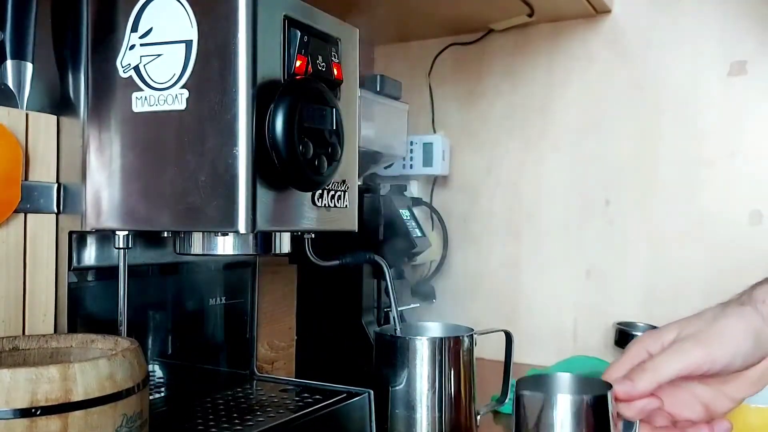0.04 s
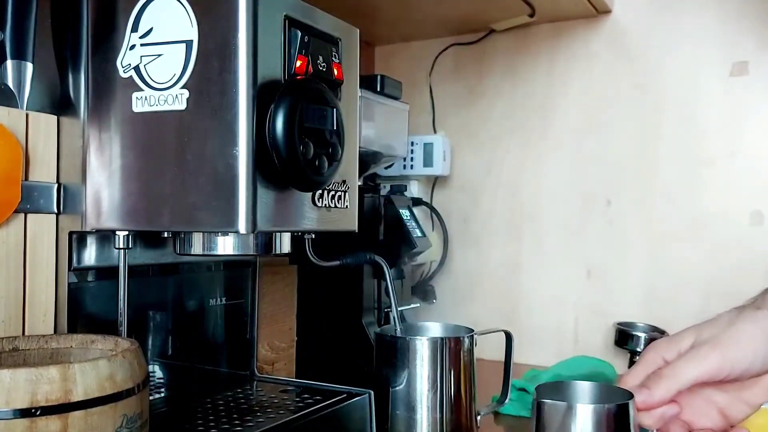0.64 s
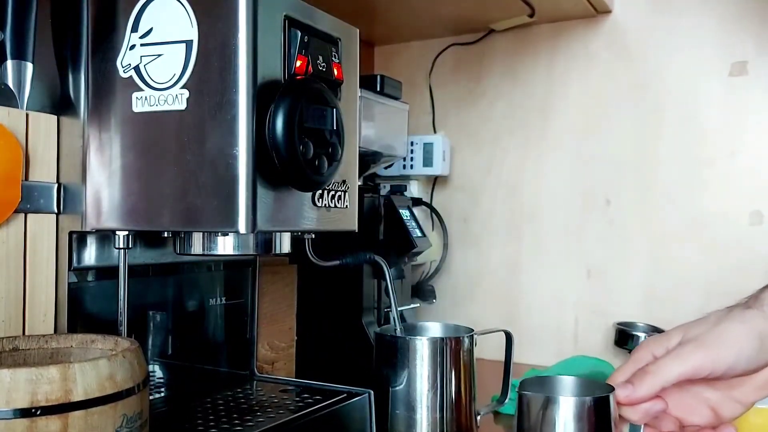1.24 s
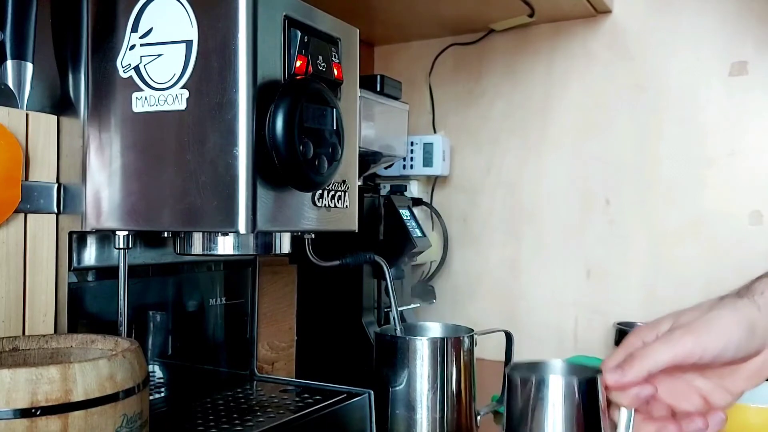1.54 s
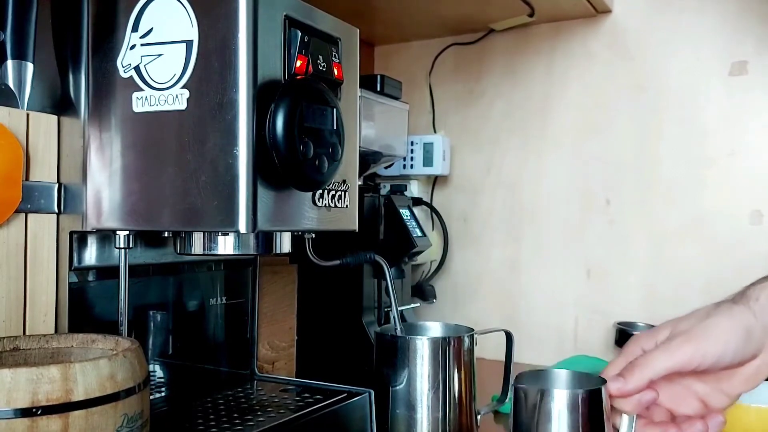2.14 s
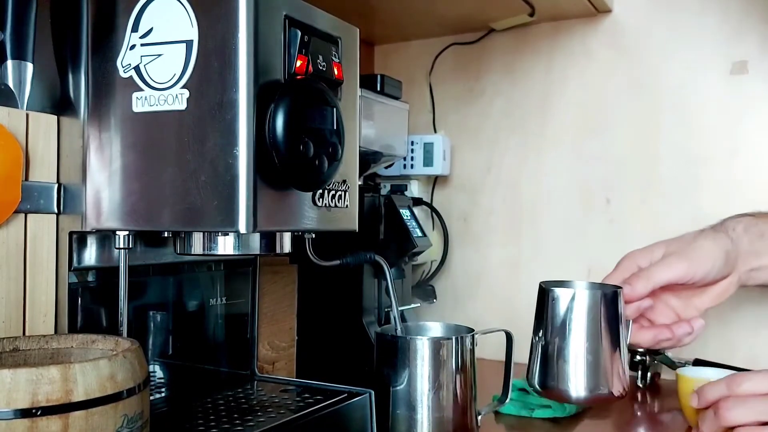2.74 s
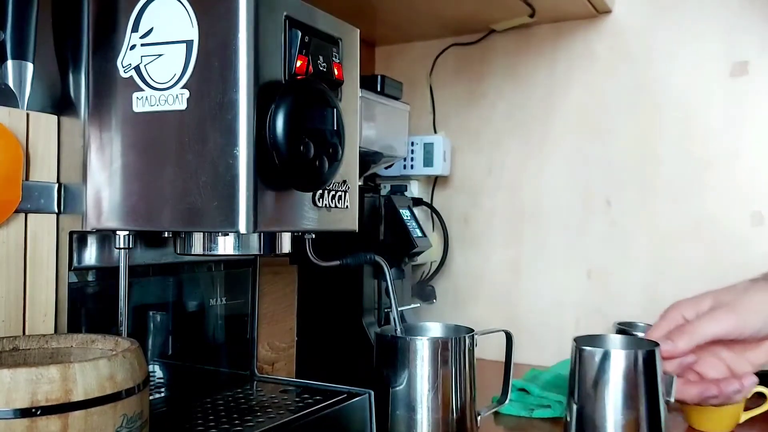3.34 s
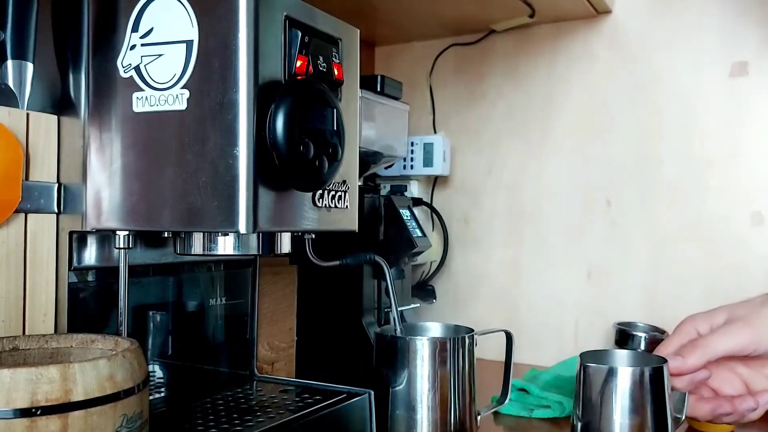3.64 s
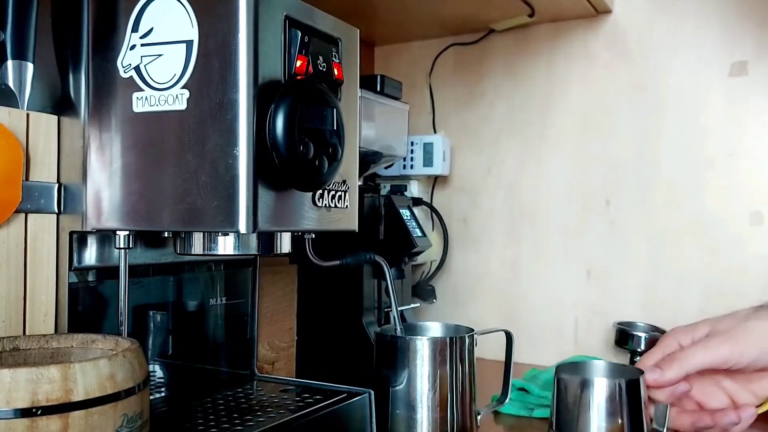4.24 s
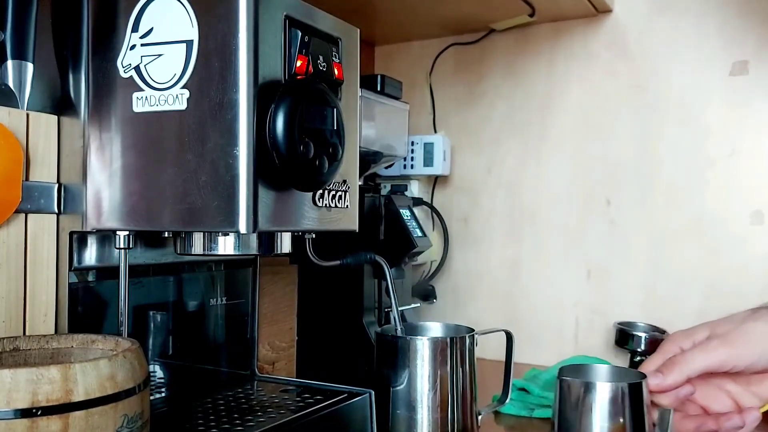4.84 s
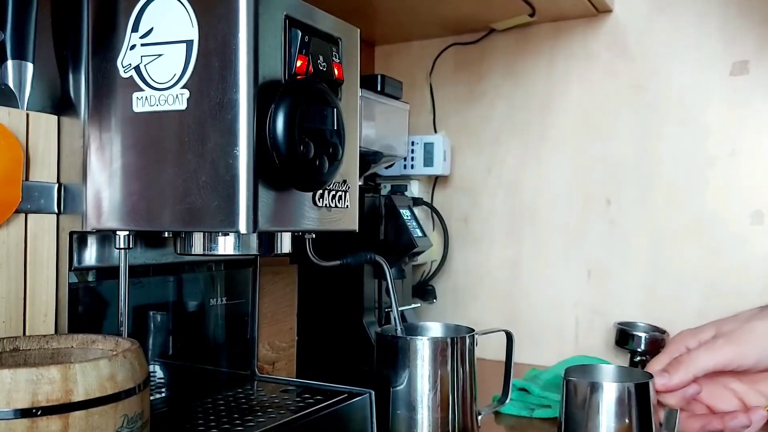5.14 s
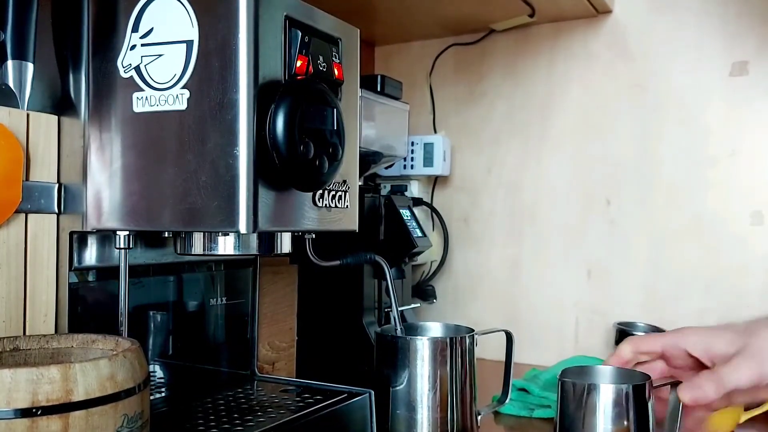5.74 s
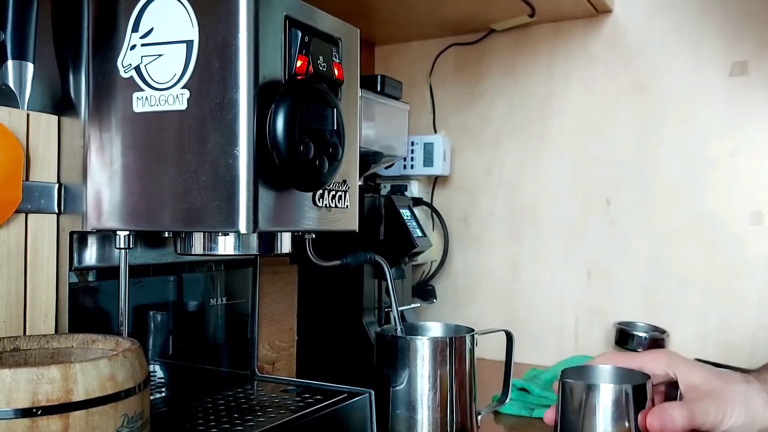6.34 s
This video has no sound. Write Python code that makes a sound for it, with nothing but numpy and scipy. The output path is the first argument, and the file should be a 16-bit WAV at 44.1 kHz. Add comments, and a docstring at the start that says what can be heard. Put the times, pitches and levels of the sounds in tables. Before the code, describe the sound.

A steel milk pitcher is knocked on a wooden counter in short sets and swirled, while a steam wand hisses faintly.

```python
"""A steel pitcher of foamed milk is knocked on a wooden counter to burst the bubbles: each impact excites
damped modes of wood and steel, while the steam wand hisses faintly. Three knocks, some scraping, three
more; then a cup is slid aside, and friction makes the dragged pitcher sing. After another three knocks
it is swirled ever more firmly, a low drone swells, and two knocks end the scene.
The near microphone rounds off their peaks, as it does throughout."""
import sys
import numpy as np
from scipy import signal
from scipy.fft import rfft, irfft
from scipy.io import wavfile
from scipy.ndimage import uniform_filter1d

SR = 44100
rng = np.random.default_rng(int(sys.argv[2]) if len(sys.argv) > 2 else 0)


def master(y):
    """Save y as 16-bit WAV."""
    cut = np.clip(np.atleast_2d(y).T, -1, 1)
    pcm = np.round(cut * 32767)  # scale
    wavfile.write(sys.argv[1], SR, pcm.astype(np.int16))


N = 290619
TIME = np.arange(N) / SR
# modes of the pitcher's wall, damped by milk and hand: pitch_hz, level_db, t60_s
STEEL_MODES = [(1451, -7, .35), (1547, -9, 0.5), (1770, -10, 0.34), (2035, -8, 0.22), (2150, -9, 0.68),
               (2260, -4, 0.27), (2480, -9.5, 0.18), (2640, -19, 0.12), (2890, -14.5, .35),
               (5700, -18.5, .3), (6200, -15, 0.5)]


def amp(db):
    """Amplitude ratio of a level in decibels."""
    return 10 ** (np.asarray(db) / 20)


def unit_rms(x):
    """Normalisation to unit mean power."""
    return x / np.sqrt(np.mean(x ** 2) + 1e-20)


def value_at(points, hz):
    """Interpolation on a logarithmic frequency axis."""
    frequency_hz, value = np.transpose(points)
    return np.interp(np.log(hz + 1), np.log(frequency_hz + 1), value)


def add(mix, start_s, sound):
    """Superposition: a stereo sound joins the mix at start_s."""
    part = mix[:, max(round(start_s * SR), 0):][:, :sound.shape[1]]
    part += sound[:, :part.shape[1]]


def band(centre_hz, octaves):
    """Flat-topped band-pass response, in rows of frequency_hz, gain_db."""
    hz = np.geomspace(20, 16000, num=300)
    return np.transpose([hz, -10 * np.log10(1 + (np.log2(hz / centre_hz) / octaves) ** 4)])


def high_pass(x, hz):
    """Second-order Butterworth bass cut."""
    return signal.sosfilt(signal.butter(2, hz, "high", fs=SR, output="sos"), x)


def colour(x, spectrum):
    """Minimum-phase filter: its phase follows from the log gain by the Hilbert transform."""
    hz = abs(np.fft.fftfreq(4096, 1 / SR))
    log_gain = np.log(amp(np.maximum(value_at(spectrum, hz), -100)))
    taps = np.fft.ifft(np.exp(np.conj(signal.hilbert(log_gain)))).real[:2048]
    return signal.fftconvolve(x, taps[None], axes=1)[:, :x.shape[1]]


def random_gain(position, depth_db):
    """Log-normal fluctuation, with a new value at each whole step of position."""
    steps = rng.standard_normal(4000)
    return amp(depth_db * np.interp(position, np.arange(len(steps)), steps))


def flutter(rate_hz, depth_db):
    """Random modulation: a factor that wanders about rate_hz times a second."""
    return random_gain(TIME * rate_hz, depth_db)


def noise(spectrum, size=N, resonant=False):
    """Diffuse-field noise of rms 1: the channels are coherent in the bass, independent in the treble."""
    # likeness of left and right: frequency_hz, correlation
    coherence = [(60, 0.94), (300, 0.94), (630, 0.27), (1300, 0), (15000, 0.012)]
    hz = np.fft.rfftfreq(size, 1 / SR)
    left, independent = rfft(rng.standard_normal((2, size)))
    correlation = np.clip(value_at(coherence, hz), -1, 1)
    right = correlation * left + np.sqrt(1 - correlation ** 2) * independent
    shape = amp(value_at(spectrum, hz))
    if resonant:  # crowded resonances ripple the spectrum, less so in the bass
        shape = shape * random_gain(hz / 53.86, depth_db=5) ** np.minimum(hz / 1200, 1)
    return unit_rms(irfft(np.array([left, right]) * shape, size))


def gesture(start_s, length_s, attack_s=0.033, release_s=0.043, sag_db_per_s=0):
    """Envelope of one movement: linear attack, a hold that may sag, exponential release."""
    t = np.maximum(TIME - start_s, 0)
    release = np.exp(-np.maximum(t - length_s, 0) / release_s)
    return np.minimum(t / attack_s, 1) * amp(-sag_db_per_s * t) * release


def patchy(x, depth_db=3.5):
    """Turbulence and friction are unsteady: brief patches of the treble swell and sink."""
    hz, _, spectra = signal.stft(x, SR, nperseg=1024)
    field = uniform_filter1d(rng.standard_normal(spectra.shape[1:]), size=3, axis=0)
    field = unit_rms(uniform_filter1d(field, size=7, axis=1))
    spectra = spectra * amp(depth_db * field * np.minimum(hz / 1500, 1)[:, None])
    return signal.istft(spectra, SR, nperseg=1024)[1][:, :N]


def drone():
    """A low sine under random frequency modulation swells towards the end."""
    # course of the tone: time_s, pitch_hz, level_db
    course = [(0, 55.1, -59.5), (3.8, 56, -68), (4.2, 56.6, -50), (5.0, 54.3, -61), (5.32, 55.9, -52),
              (5.55, 52.4, -61), (6.33, 56.8, -40), (6.59, 57.3, -43)]
    time_s, pitch_hz, level_db = np.transpose(course)
    wavering_hz = np.interp(TIME, time_s, pitch_hz) * flutter(rate_hz=10, depth_db=1.3)
    cycles = np.cumsum(wavering_hz) / SR
    return amp(np.interp(TIME, time_s, level_db)) * np.sin(2 * np.pi * cycles)


def cabinet_booms():
    """Forced vibration: things moved on the counter drive two low modes of the cabinet."""
    # soft booms: start_s, length_s, level_db
    booms = [(1.28, 0.1, -54), (1.45, 0.085, -51), (2.92, 0.67, -60), (3.62, 0.085, -59),
             (3.92, 0.47, -54.5), (6.003, 0.15, -46), (6.231, 0.16, -47)]
    drive = amp(-64)  # between the booms
    for start_s, length_s, level_db in booms:
        push = gesture(start_s, length_s, attack_s=0.023, release_s=0.028)
        drive = np.hypot(drive, amp(level_db) * push)
    return drive * (noise(band(106, octaves=0.093)) + amp(-5.5) * noise(band(168.5, octaves=0.035)))


def background():
    """Stationary room noise, with drone and booms set slightly left by a level difference."""
    # quiet of the kitchen: frequency_hz, density_db
    room_spectrum = [(15, -31), (25, -10), (95, 4.5), (175, -1), (210, -7), (420, -1), (796, -12.5),
                     (1510, -10.5), (2860, -27.5), (5560, -20), (9220, -36.5), (13000, -59), (14500, -31.5)]
    return (drone() + cabinet_booms()) * amp([[1], [-1]]) + amp(-61) * noise(room_spectrum)


def steam_wand():
    """Turbulent jet noise: the last steam leaks ever more weakly and puffs with a thin sizzle."""
    # escaping steam: frequency_hz, density_db
    hiss_spectrum = [(1500, 8), (3500, 1), (6000, 1), (9000, 1.5), (12000, 7.5), (14500, 0.5)]
    # puffs of steam: start_s, length_s, hiss_db, sizzle_db
    puffs = [(-0.05, 0.67, -54, -84.5), (3.556, 0.07, -72, -54.5), (3.89, 0.56, -65.5, -62),
             (4.2, 0.064, -61, -51), (4.3, 0.33, -59.5, -78), (5.01, 0.16, -80, -70.5),
             (5.83, 0.26, -63, -88)]
    sizzle_spectrum = [(10500, -47), (12500, -2.5), (13200, -2.0), (14400, -9.5)]
    flow, spit = amp(-59.5 - 2.5 * TIME), np.zeros(N)
    for start_s, length_s, hiss_db, sizzle_db in puffs:
        puff = gesture(start_s, length_s, attack_s=0.045, release_s=0.06, sag_db_per_s=3)
        flow = np.hypot(flow, amp(hiss_db) * puff)  # incoherent sources add in power
        spit = np.hypot(spit, amp(sizzle_db) * puff)
    hiss = noise(hiss_spectrum) * flow * flutter(rate_hz=35, depth_db=-0.9)
    sizzle = noise(sizzle_spectrum) * spit * flutter(rate_hz=25, depth_db=-1.0)
    return hiss + sizzle


def sliding_cup(start_s=2.717, length_s=0.78, level_db=-43):
    """Sliding friction: the cup's grainy noise follows a power law of its speed."""
    # cup rubbing on wood: frequency_hz, density_db
    cup_spectrum = [(120, -71), (200, -18), (313, -9), (410, -4), (456, -8.5), (620, 3), (727, -8.5),
                    (830, -3.5), (1100, -11.5), (1310, -7.5), (1880, -17), (2020, -20.5), (9600, -29.5),
                    (13500, -26), (14500, -34)]
    progress = np.clip((TIME - start_s) / length_s, 0, 1)
    speed = abs(np.sin(np.pi * progress ** 1.38))  # top speed comes late
    rubbing = noise(cup_spectrum) * amp(level_db) * speed ** 0.79
    return rubbing * flutter(rate_hz=100, depth_db=0.5) * amp([[1.5], [-.5]])


def friction_envelopes(swirl_start_s=4.9, turns_per_s=6.12):
    """Friction drives rumble and scrape: single strokes, then circles that bear down ever harder."""
    # strokes of the pitcher's base: start_s, length_s, rumble_db, scrape_db
    strokes = [(0.798, 0.14, -61.5, -52.5), (0.996, 0.1, -55, -68), (1.142, 0.077, -55, -50.5),
               (1.322, 0.19, -59.5, -55), (2.505, 0.027, -71.5, -56), (2.67, 0.06, -57, -65),
               (3.515, 0.37, -51, -60), (3.844, 0.098, -48.5, -44), (3.94, 0.48, -50.5, -55),
               (6.297, 0.087, -54.5, -45)]
    t = np.maximum(TIME - swirl_start_s, 0)
    circles = np.minimum(t / 0.059, 1) * amp(0.6 * np.cos(2 * np.pi * turns_per_s * t))
    rumble = circles * amp(-60 + 3.5 * t)
    scrape = circles * amp(-71 + 9 * t)
    for start_s, length_s, rumble_db, scrape_db in strokes:
        push = gesture(start_s, length_s, sag_db_per_s=9)
        rumble = np.hypot(rumble, amp(rumble_db) * push)
        scrape = np.hypot(scrape, amp(scrape_db) * push)
    return rumble, scrape


def singing_wall(width_hz=7, level_db=-51):
    """Resonance: friction sustains the narrow modes of the steel wall, the lower ones most."""
    # force of dragging: frequency_hz, level_db
    drag_spectrum = [(1200, 12.5), (1560, -0.5), (1800, -2), (2100, -8.5), (2400, -23), (2830, -0.5),
                     (4000, -11.5), (7000, -19.5)]
    hz = np.fft.rfftfreq(N, 1 / SR)
    response = sum(amp(db) / (1 + ((hz - mode_hz) / width_hz) ** 2) for mode_hz, db, _ in STEEL_MODES)
    force = rfft(rng.standard_normal((2, N))) * amp(value_at(drag_spectrum, hz))
    drag = amp(level_db) * gesture(start_s=3.85, length_s=0.41, sag_db_per_s=16.5)
    return unit_rms(irfft(force * response, N)) * drag


def swirling():
    """Uneven friction under the pitcher: the counter rumbles, the steel scrapes, the milk swishes."""
    # rubbed counter: frequency_hz, density_db
    rumble_spectrum = [(120, -20.5), (230, -14.5), (310, 1.5), (400, -9), (540, -3.5), (700, -14),
                       (1100, -15.5), (2500, -33.5)]
    # scraping steel: frequency_hz, density_db
    scrape_spectrum = [(500, -22), (1000, 4), (1500, 4.5), (2100, 1), (2600, -7.5), (4200, -11.5),
                       (6500, -23), (14000, -12)]
    # swishes of milk and base, and at 4.09 s a thin sizzle of steam: start_s, length_s, level_db, centre_hz,
    # half_width_octaves
    swishes = [(0.81, 0.049, -62.5, 3900, 0.16), (0.893, 0.066, -63, 5970, 1.7),
               (1.048, 0.068, -60.5, 3850, 0.21), (1.163, 0.058, -60, 7000, 1.4),
               (1.325, 0.07, -58, 3750, 0.46), (1.398, 0.11, -45.5, 7500, 1.6),
               (3.84, 0.085, -60, 5000, 1.5), (4.091, 0.062, -53, 11500, 0.42),
               (6.314, 0.059, -52, 4500, 1.2)]
    rumbling, scraping = friction_envelopes()
    rumble = noise(rumble_spectrum) * amp(-1) * rumbling * flutter(rate_hz=10, depth_db=-2.3)
    scrape = noise(scrape_spectrum) * amp(-3) * scraping * flutter(rate_hz=130, depth_db=2.0)
    out = rumble + scrape + singing_wall()
    for start_s, length_s, level_db, centre_hz, octaves in swishes:
        progress = np.maximum(TIME - start_s, 0) / length_s
        envelope = np.minimum(progress / 0.17, 1) * np.exp(-progress ** 2)
        out += amp(level_db) * noise(band(centre_hz, octaves), resonant=True) * envelope
    return out


def reverberation():
    """One second of diffuse kitchen echoes, each band decaying exponentially at its own rate."""
    # echoes at their onset: frequency_hz, density_db
    echo_spectrum = [(40, -13), (190, -26.5), (260, 0), (450, 0), (620, -2), (820, -4.5), (1050, -10.5),
                     (1300, -12), (1520, -18), (2450, -23.5), (3100, -31.5), (6300, -38.5), (14500, -42)]
    # reverberation times: frequency_hz, t60_s
    decay_times = [(100, 0.71), (400, 0.32), (1000, 0.33), (2500, 0.4), (6000, 0.47), (14000, 0.34)]
    hz, t, spectra = signal.stft(noise(echo_spectrum, size=SR, resonant=True), SR, nperseg=256)
    decay = amp(-60 * t / value_at(decay_times, hz)[:, None])
    return signal.istft(spectra * decay, SR, nperseg=256)[1][:, :SR]


def ring(modes, t, scatter_db, detune, phase):
    """Free vibration as a sum of damped sines; each blow lands elsewhere and weights the modes anew."""
    # longest ring that losses in wood, milk and hand allow: frequency_hz, t60_s
    decay_limits = [(70, .8), (160, .45), (400, .4), (800, .3), (2500, .3), (6000, .15)]
    hz, level_db, t60_s = np.transpose(modes)[:, :, None]
    t60_s = np.minimum(t60_s, value_at(decay_limits, hz))
    weight, shift = rng.standard_normal((2, len(modes), 1))
    envelopes = amp(level_db + scatter_db * weight - 60 * t / t60_s)
    return (envelopes * np.sin(2 * np.pi * hz * (1 + detune * shift) * t + phase)).sum(-2)


def disperse(x, lag_s):
    """Dispersion of bending waves: the lower the slower, with a group delay of lag_s at 300 Hz."""
    hz = np.fft.rfftfreq(2 * SR, 1 / SR)
    phase = 4 * np.pi * lag_s * np.sqrt(300 * hz)
    return irfft(rfft(x, 2 * SR) * np.exp(-1j * phase))[:, :SR]


def struck_wood(t, build_s=0.003, notch_hz=204.5, notch_width_hz=100):
    """Modal response of counter and cabinet, with the same energy wherever the blow lands."""
    # counter top and loaded pitcher, well damped: pitch_hz, level_db, t60_s
    counter_modes = [(278, -33, 0.073), (307.5, -2, 0.08), (390, -29, 0.036), (431.5, -11.5, 0.13),
                     (688, -15, 0.026), (803, -9, 0.048), (964, -37, 0.02), (1280, -37, 0.26),
                     (1947, -21, 0.019), (2350, -37, 0.075)]
    # lasting modes of cabinet and kitchen: pitch_hz, level_db, t60_s
    cabinet_modes = [(57.3, -49.5, 0.88), (68.6, -30, 0.55), (106.7, -25.5, 0.39), (162.2, -22.5, 0.44),
                     (254.3, -23, 0.52), (262.1, -17, 0.3), (284, -13.5, 0.17), (331.5, -22, 0.13),
                     (366.8, -21.5, 0.35), (381.2, -16.5, 0.18), (408.6, -24.5, 0.33), (465.4, -26.5, 0.32),
                     (490, -28, 0.3), (566.3, -24, 0.28), (574, -22.5, 0.065), (744, -20, 0.073),
                     (749, -43, 1), (790, -58.5, 0.44), (932, -25, 0.13), (1178, -35, 0.13),
                     (1180, -42, 0.18)]
    thud = ring(counter_modes, t, scatter_db=1, detune=.02, phase=0)
    thud = high_pass(thud, hz=192.2)  # a board radiates little below its lowest mode
    # standing waves reach the two channels a little out of step
    phase = 0.43 * rng.standard_normal((2, len(cabinet_modes), 1))
    cabinet = ring(cabinet_modes, t, scatter_db=3.96, detune=0.0063, phase=phase)
    cabinet *= 1 - np.exp(-t / build_s)
    wood = -disperse(amp(-4) * thud + amp(-2) * cabinet, lag_s=0.001038)
    antiresonance = signal.iirnotch(notch_hz, notch_hz / notch_width_hz, fs=SR)
    return unit_rms(high_pass(signal.lfilter(*antiresonance, wood), hz=44))


def blow(kitchen, crack_s=0.0057, rattle_s=0.013):
    """Impact excitation: a crack and a wooden thud, then steel, cabinet and room ring on."""
    # steel meeting wood: frequency_hz, density_db
    crack_spectrum = [(500, -29.5), (1200, 20.5), (2400, -3.5), (3300, -10.5), (6200, -5.5), (10000, -9),
                      (14500, -8.5)]
    t = np.arange(SR) / SR
    wood = struck_wood(t)
    phase = rng.uniform(0, 2 * np.pi, (2, len(STEEL_MODES), 1))
    steel = ring(STEEL_MODES, t, scatter_db=2.5, detune=.002, phase=phase)
    # the echoes are partly common to all blows, partly new
    echoes = unit_rms(kitchen + 0.71 * reverberation()) * np.sqrt(np.mean(kitchen ** 2))
    room = echoes * np.minimum(t / 0.0015, 1) * amp([[.9], [-.9]])
    contact = amp(-24) * np.exp(-t / crack_s) + amp(-31) * np.exp(-t / rattle_s)
    crack = noise(crack_spectrum, size=SR, resonant=True) * contact
    return crack + amp(-30) * wood + amp(-39) * steel + amp(-20) * room


def landing(force_db, spot_hz, lift_db, hardness_db, spot_octaves=0.55):
    """Spectrum of an impact: the striking point favours one range, a harder contact lifts the treble."""
    hz = np.geomspace(20, 16000, num=100)
    favoured = np.exp(-.5 * (np.log2(hz / spot_hz) / spot_octaves) ** 2)
    treble = value_at([(3900, 0), (4000, 1)], hz)
    return np.transpose([hz, force_db + lift_db * favoured + hardness_db * treble])


def knocks(clank_t60_s=0.25):
    """Contact time sets brightness: hard knocks crack or clank, soft bumps last longer and are dull."""
    # knocks of the pitcher: start_s, force_db, spot_hz, lift_db, hardness_db
    hard_knocks = [(0.028, 0.5, 232, 4, -2), (0.2648, 1, 430, 5, -2), (0.481, 0, 352, 5.5, 4),
                   (1.682, 2.5, 617, 2.5, -1), (1.9261, -0.5, 312, 6.5, 1.5), (2.1685, 2.5, 228, 4.5, 0),
                   (4.2654, 2, 257, 4, 0.5), (4.5046, 2, 914, 2.5, 0), (4.719, -1.5, 820, 2.5, -2.5),
                   (6.4034, 4, 225.4, 3, 5), (6.5866, 0.5, 130, 17, 2.5)]
    # light bumps of pitcher and cup: start_s, relative_db, dull_above_hz
    bumps = [(.64, -11, 366), (2.753, -31, 1470), (5.7099, -28.5, 287)]
    # landings on the pitcher's edge: start_s, level_db, pitch_hz
    clanks = [(.028, -34.5, 2200), (.265, -35.5, 2400), (.481, -30.5, 2230), (4.506, -41, 5700),
              (4.718, -45.5, 5700), (6.402, -27, 2410)]
    out, kitchen, t = np.zeros((2, N)), reverberation(), np.arange(SR) / SR
    for start_s, force_db, spot_hz, lift_db, hardness_db in hard_knocks:
        add(out, start_s, colour(blow(kitchen), landing(force_db, spot_hz, lift_db, hardness_db)))
    for start_s, relative_db, dull_above_hz in bumps:
        treble_cut = [(dull_above_hz, 0), (4 * dull_above_hz, -20)]
        add(out, start_s, amp(relative_db) * colour(blow(kitchen), treble_cut))
    for start_s, level_db, pitch_hz in clanks:
        clank = noise(band(pitch_hz, octaves=0.14), size=SR, resonant=True)
        add(out, start_s, clank * amp(level_db - 60 * t / clank_t60_s))
    return out


def scene():
    """Superposition of all sources on and around the counter."""
    return knocks() + patchy(swirling() + sliding_cup() + steam_wand()) + background()


def record(dry, edge_hz=14750):
    """Soft saturation in the near microphone rounds the peaks, between a bass cut and a band limit."""
    pressure = high_pass(dry, hz=38)
    rounded = pressure / (1 + pressure ** 4) ** (1 / 4)
    low_pass = signal.firwin(401, edge_hz, window=("kaiser", 8), fs=SR)
    return signal.oaconvolve(rounded, low_pass[None], "same")


dry = scene()
out = record(dry)
master(out)
```